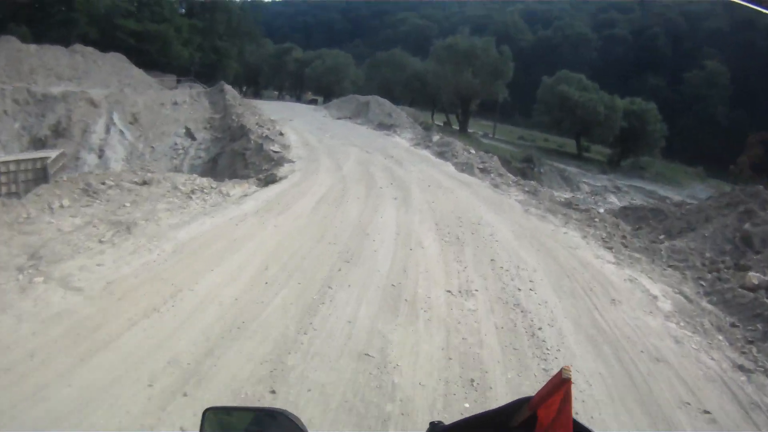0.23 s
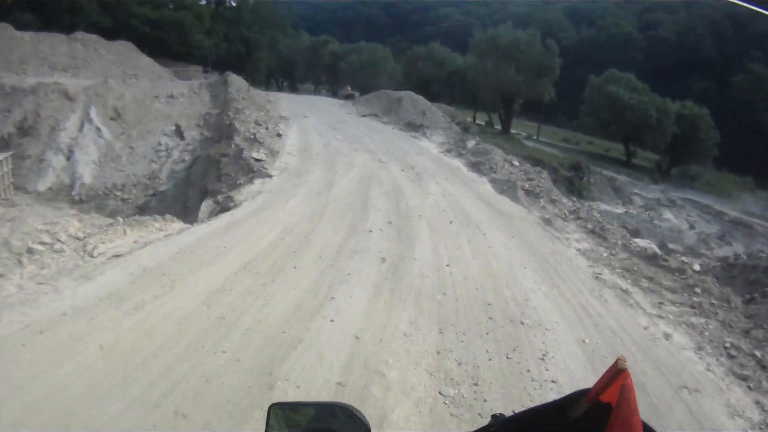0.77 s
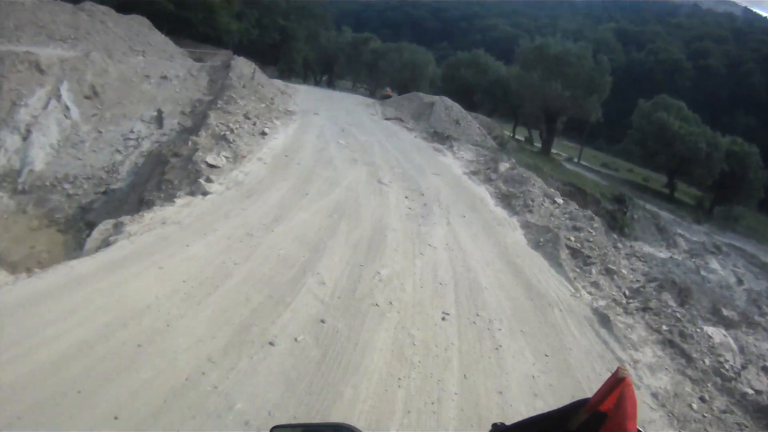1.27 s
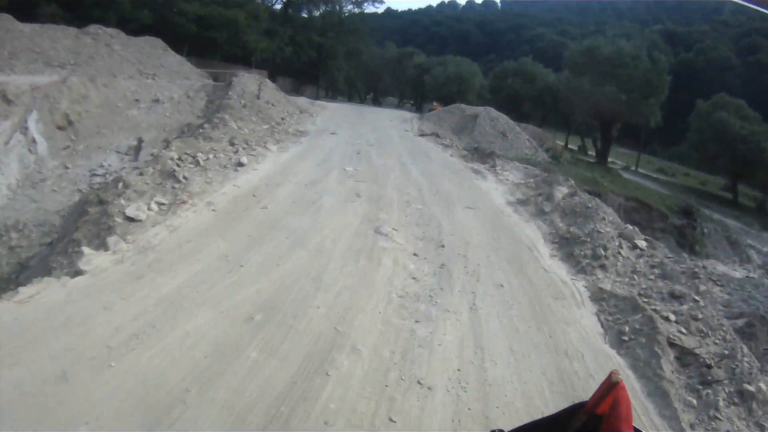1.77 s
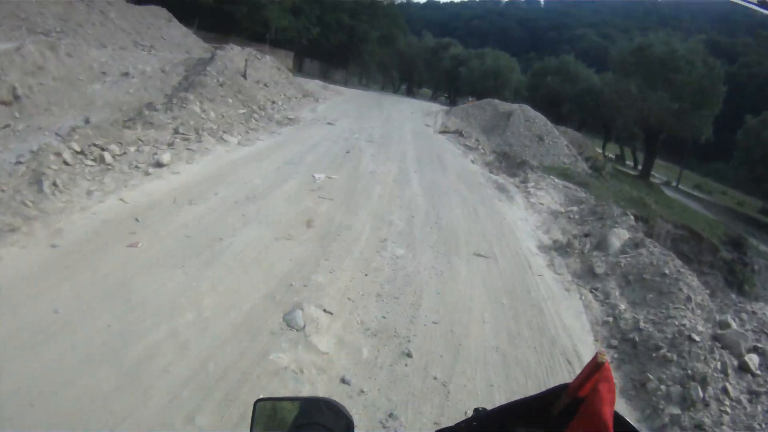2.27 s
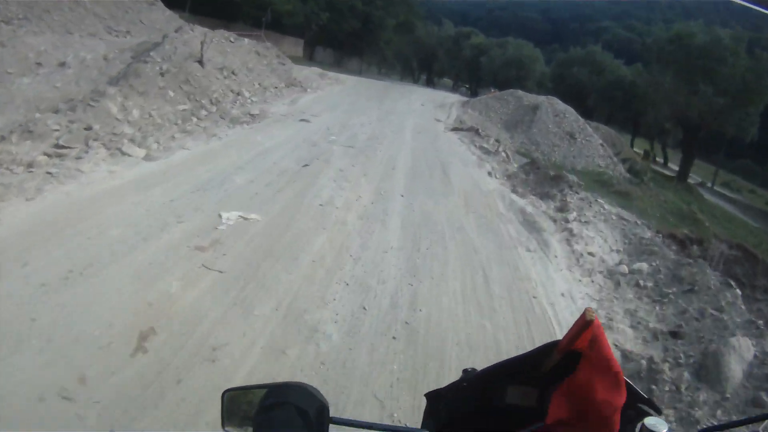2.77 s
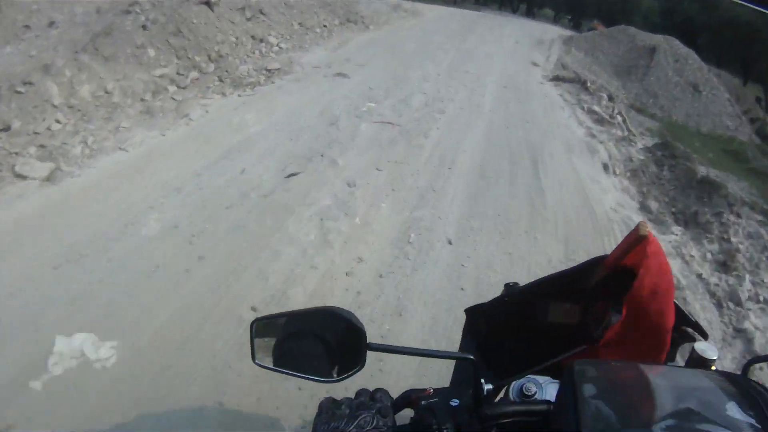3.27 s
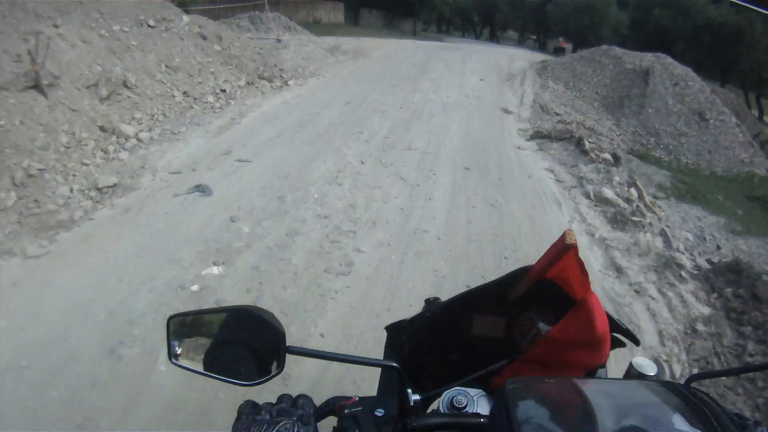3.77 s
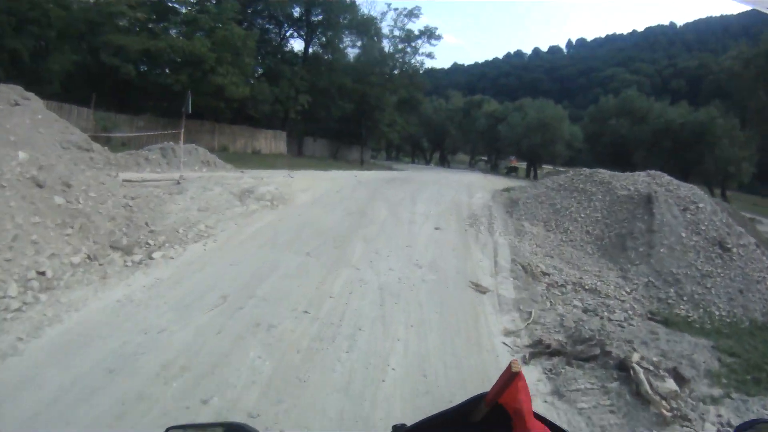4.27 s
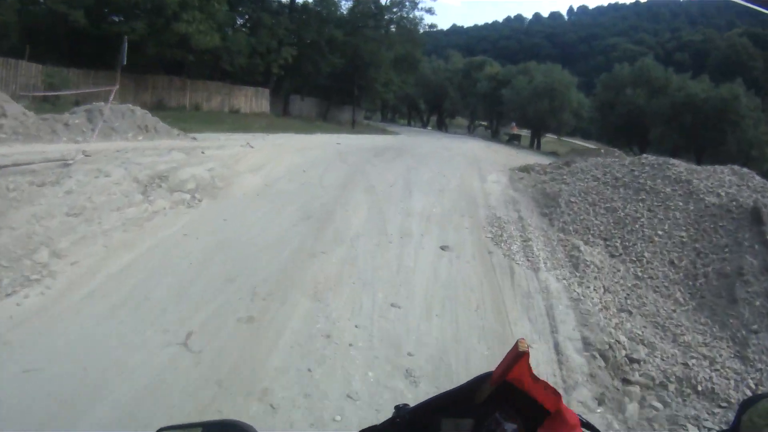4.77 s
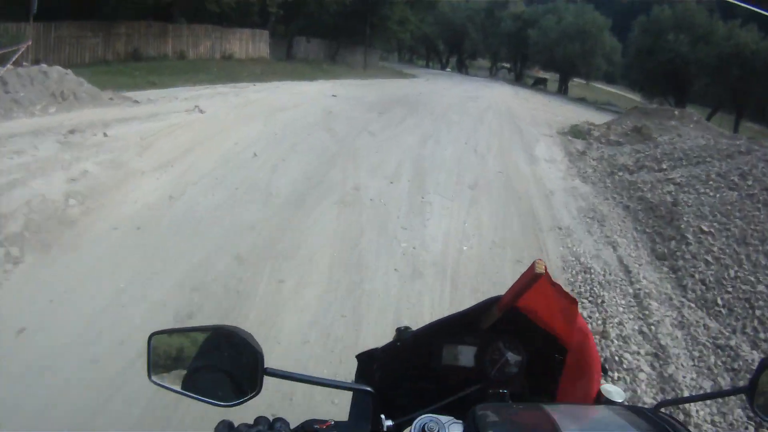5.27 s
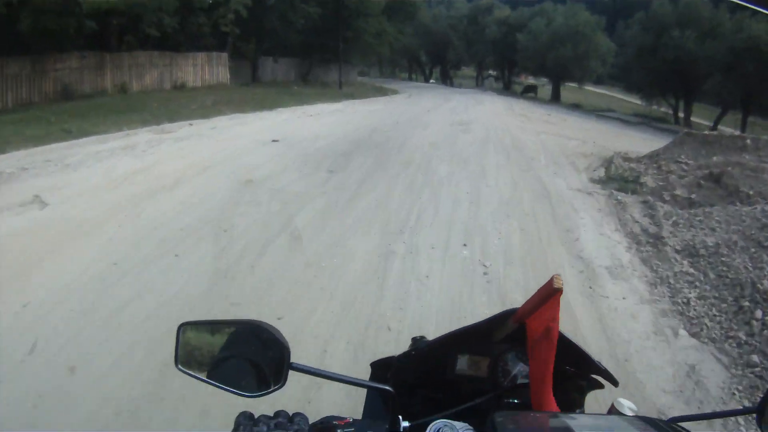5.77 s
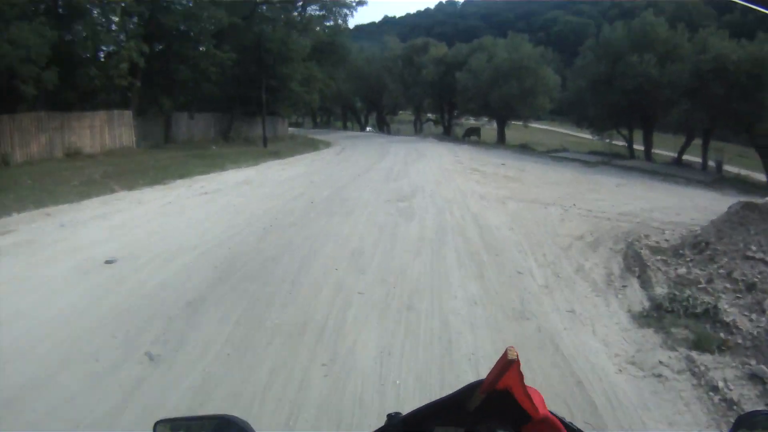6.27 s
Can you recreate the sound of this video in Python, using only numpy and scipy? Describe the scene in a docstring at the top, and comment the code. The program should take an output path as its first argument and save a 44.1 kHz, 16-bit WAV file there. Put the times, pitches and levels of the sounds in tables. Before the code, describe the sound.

From 0 to about 2.5 seconds, a small motorcycle putters on light throttle, its low hollow exhaust puffing roughly 43 times a second, often skipping weakly and catching again. A rough gear whine near 1100 Hz sings out briefly around 0.2, 0.8 to 1.0 and 2.1 to 2.5 seconds. Close to the rider, tyres rumble, chain and casings clatter, and gravel crunches faintly. Knocks rattle the bodywork around 0.6, 1.1, 1.4 and 1.6; stones ping softly at times, and dry grit ticks at 0.7, 3.1 and 3.55. Speed climbs from 2.5, still stumbling, then jumps around 3.6 to a quicker, fuller, mostly even pull near 70 firings a second. Dull bumps land around 4.1, 4.35, 4.8 and 5.4, with a short hiccup at 5.15. At 6.1 the throttle shuts; the note weakens and drops, sputtering as rumble and clatter swell with a rattling double bump near 6.4.

```python
"""A small motorcycle rides along a gravel road, heard from a camera carried by the rider.
The engine stumbles and skips firings on a light throttle, then pulls evenly until the throttle shuts.
Exhaust puffs ring a silencer resonance over a low throb, and a rough sine is the gear's whine.
Shaped random grains make the rumble, clatter and gravel crunch.
Bumps are dying noise and ringing panels; stone pings and grit ticks are dying tones."""
import sys
import numpy as np
from scipy import signal
from scipy.fft import rfft, irfft, next_fast_len
from scipy.io import wavfile
from scipy.ndimage import uniform_filter1d, map_coordinates

SR = 44100
rng = np.random.default_rng(int(sys.argv[2]) if len(sys.argv) > 2 else 0)


def wrap_up_sound(samples):
    """Save the sound to the file named by the first command line argument, as 16-bit audio."""
    columns = np.atleast_2d(samples).T
    # keep every value between -1 and 1, then stretch to whole-number steps
    tamed = np.clip(columns, -1, 1)
    steps = np.round(tamed * 32767).astype(np.int16)
    wavfile.write(sys.argv[1], SR, steps)


N = 287084
T = np.arange(N) / SR  # time of each sample, seconds

# Roughness of the ride. Each row: time in seconds, rumble level in dB, clatter level in dB.
ROAD_LEVELS = [(0, -29, -39.5), (.9, -29, -40), (1.03, -31, -42), (1.17, -28.5, -40), (1.8, -32.5, -40.5),
               (2.25, -30, -39.5), (2.9, -27.5, -39), (3.45, -30.5, -39.5), (3.8, -36, -43.5),
               (4.0, -36, -41.5), (4.2, -31.5, -40.5), (4.85, -30, -38), (5.03, -31.5, -39),
               (5.23, -26.5, -39), (5.5, -32.5, -39.5), (5.87, -32.5, -40), (6.13, -31.5, -39.5),
               (6.38, -25, -36), (6.51, -27.5, -33.5)]
# Tone colour of tyres, frame and air. Each row: pitch in Hz, relative dB per Hz.
RUMBLE_COLOUR = [(25, -32.5), (42, -14), (70, -12), (110, -3.5), (165, -2.5), (240, 1), (390, 1),
                 (500, 1.3), (610, 0), (700, -6), (860, -10), (1000, -11), (1300, -18), (2000, -33),
                 (4000, -66)]
# Tone colour of casings and chain. Each row: pitch in Hz, relative dB per Hz.
CLATTER_COLOUR = [(400, -23.5), (850, 4), (980, 7), (1350, 1.5), (1550, 1), (1830, 0.5), (2300, -7),
                  (2750, -17), (3250, -17), (3900, -30), (5000, -40), (9000, -68)]
# Tone colour of gravel. Each row: pitch in Hz, relative dB per Hz.
CRUNCH_COLOUR = [(2000, -18), (3800, 2), (4900, -3.5), (5500, 4.5), (6100, 2), (7000, -4.5), (9000, -8.5),
                 (11000, -10), (15000, -20.5)]
# The crunch grows quieter later on. Each row: time in seconds, change in dB from CRUNCH_DB.
CRUNCH_CHANGES = [(3.4, 0.5), (4.1, -3.5), (6.099, -3), (6.4, -1)]
CRUNCH_DB = -71.5
# How far the rattling parts' resonances come and go, and the pitch below which they do so less
PATCH_DB, PATCH_HZ = 2.4, 600

# Bumps that rattle the bike; soft ones stay dull. Each row: start in seconds, bodywork drive in dB,
# loose metal level in dB, time to die by 60 dB in seconds, brightness limit of the bodywork in Hz.
BUMPS = [(.603, -26.5, -49, 0.066, 1100), (1.13, -20, -60.5, 0.059, 1900), (1.141, -20.5, -68, .06, 1700),
         (1.422, -22, -45, .06, 2320), (1.593, -25, -67, 0.032, 1200), (1.65, -24, -51.5, 0.057, 1890),
         (2.576, -25.5, -74, .04, 810), (3.238, -27.5, -61, 0.036, 1097), (4.09, -24.5, -70, 0.045, 894),
         (4.352, -24.5, -77, 0.063, 900), (4.66, -32, -77, 0.03, 1100), (4.768, -21, -68, 0.034, 893),
         (5.417, -18, -82, 0.04, 560), (6.365, -26, -63.5, 0.088, 1986), (6.395, -23.5, -45.5, 0.069, 2040)]
# Tone colour of the bodywork's rattle. Each row: pitch in Hz, relative dB per Hz.
PANEL_COLOUR = [(250, -13.5), (550, 9), (850, 3.5), (1100, 6.5), (1450, -12.5), (2000, -2), (3000, -24.5),
                (5000, -33.5)]
# Tone colour of loose metal parts. Each row: pitch in Hz, relative dB per Hz.
FITTING_COLOUR = [(1000, -24), (2700, 14.5), (4500, -1.5), (6000, -3.5), (9000, -28), (15000, -33)]
# Ringing notes of the bodywork. Each row: average pitch in Hz, average relative level in dB.
PANEL_MODES = [(475, -3.5), (600, -6), (760, -1.5), (950, -2), (1160, -6), (1420, -10), (1700, -13.5),
               (1930, -16.5)]
CONTACT_S = .001  # a panel takes this long to ring up
REBOUND_S, REBOUND_DB = .01, -5  # a knocked panel strikes once more, weaker
# Stones pinging on metal. Each row: start in seconds, level in dB.
STONES = [(.482, -56), (1.653, -54), (2.503, -58.5), (5.296, -65.5), (6.223, -62)]
# Notes of the struck metal. Each row: average pitch in Hz, average relative level in dB,
# time to die by 60 dB in seconds.
METAL_MODES = [(5350, -3, .06), (5840, -8, 0.029), (6200, -6, 0.043), (10950, -22, 0.051)]
# Sharp ticks on the camera. Each row: start in seconds, peak level in dB.
GRIT = [(.71, -33), (3.134, -28.5), (3.5545, -27.5)]
TICK_T60 = .001  # seconds to die by 60 dB: grit ticks have no ring

# Engine speed before stumbles slow it. Each row: time in seconds, firings a second.
ENGINE_SPEED = [(0.0, 41.3), (0.22, 45.0), (0.42, 42.0), (0.6, 43.6), (1.0, 44.7), (1.2, 40.3), (1.5, 41.9),
                (2.0, 43.2), (2.5, 48.3), (3.12, 54.7), (3.52, 55.2), (3.57, 57.5), (3.62, 66.5),
                (3.7, 68.3), (3.77, 71), (3.95, 68.7), (4.02, 70.5), (4.18, 65.4), (4.31, 65.4), (4.43, 69),
                (4.5, 66.8), (4.57, 69.3), (4.91, 71.4), (4.97, 69.3), (5.05, 74.3), (5.2, 71.8),
                (5.29, 74.4), (5.39, 70.6), (5.5, 73.8), (5.6, 71.4), (5.73, 74), (5.85, 73), (5.96, 69.3),
                (6.11, 73.8), (6.16, 63), (6.25, 57), (6.31, 50), (6.42, 45), (6.51, 47)]
# Stumbles of the engine. Each row: start in seconds, number of weak firings in a row,
# weakest firing in dB, bang as it catches again in dB (both against a usual firing).
STUMBLES = [(.056, 1, -12, 0), (.105, 3, -17, 2.5), (.243, 1, -5, 2), (.29, 3, -8, 0), (.431, 1, -14, 1),
            (.48, 2, -14, 0), (.618, 1, -6, 2.5), (.665, 3, -8, 1), (.758, 1, -7, 2), (.803, 1, -14, 1),
            (.85, 2, -13, -3), (.92, 1, -3, 0), (.987, 1, -11, 1.5), (1.03, 7, -11, 1.5), (1.222, 1, -6, 0),
            (1.274, 1, -5, 1), (1.325, 3, -6, 2), (1.42, 3, -14, 0), (1.568, 1, -5, 0), (1.615, 3, -10, 0),
            (1.71, 1, -3, -1), (1.76, 1, -4, 2), (1.807, 1, -14, 0), (1.9, 3, -5, 2), (1.995, 3, -12, 0),
            (2.088, 1, -5, 0), (2.134, 1, -6, 2), (2.18, 3, -12, 3), (2.31, 1, -4, 0), (2.354, 2, -10, 0),
            (2.522, 2, -12, 0), (2.603, 1, -5, 1), (2.644, 1, -4, 1), (2.685, 2, -11, 1), (2.765, 1, -9, 1),
            (2.845, 2, -10, 0), (2.92, 1, -8, 2), (3.071, 1, -10, -1), (3.165, 4, -8, 3), (3.293, 2, -6, 2),
            (3.364, 1, -8, 4), (3.456, 1, -9, 0), (3.511, 1, -13, 2.5), (5.145, 2, -18, 2),
            (6.325, 2, -9, 1), (6.388, 1, -9, 2), (6.452, 1, -10, 0)]
CRUISE_HZ = 44  # firings a second on a light throttle
# Firings a second lost in a stumble at cruise, the delay of the loss and its half-width
SAG_HZ, SAG_LAG_S, SAG_S = 1.02, .058, .035

# Usual level of the gear whine. Each row: time in seconds, level in dB.
WHINE_LEVELS = [(0, -42), (1.45, -40.5), (1.7, -44), (2.6, -44), (3.1, -47), (3.35, -43.5), (3.52, -48),
                (3.62, -45), (3.75, -56), (3.92, -49), (4.2, -46), (4.55, -48), (5.2, -47), (5.28, -55),
                (5.35, -46), (5.65, -46.5), (5.9, -51), (6.2, -54)]
# The gear sings out as the drive takes up. Each row: middle in seconds, half-width in seconds,
# dB over its usual level, pitch in Hz at the middle, glide in Hz a second.
FLARES = [(.23, .05, 6.5, 1100, 300), (.61, .035, 3.5, 1120, -200), (.81, .04, 8, 1115, -250),
          (1.0, .05, 8, 1110, 350), (2.13, .05, 8.5, 1100, 550), (2.28, .055, 7.5, 1125, 800),
          (2.42, .05, 9.5, 1095, 0), (2.555, .014, 8, 1135, 0)]
TEETH = 24.1  # mesh cycles of the gear per firing
SLACK_HZ = 965  # floor of the whine's pitch with the drive slack, before flares and wander
# Shares at cruise: the whine's drop as a stumble slackens the drive, its wander as the chain whips
SNATCH, WANDER = .06, .012

# The throttle opens, eases, opens again and shuts. Each row: time in seconds, usual puff level in dB.
THROTTLE = [(0, -15), (2.4, -15), (3.4, -14), (3.9, -13), (4.25, -17.5), (4.45, -15.5), (5.1, -15),
            (5.22, -13), (5.45, -14.5), (6.11, -14.5), (6.135, -25), (6.25, -19.5), (6.3, -18), (6.51, -18)]
# Unevenness of the burns. Each row: time in seconds, spread in dB.
BURN_SPREAD = [(3.55, .7), (3.72, 1.8), (4.25, 1.3), (4.5, 2.2), (4.95, 2.2), (5.2, 1.6), (5.7, 1.1),
               (5.95, 1.7), (6.1, 1.0)]
SEESAW = .85  # share of a burn's excess that the next burn loses
RECOVER_DB, WEAK_DB = 3, -6  # in a stumble each firing gains this much on the last, but stays weak
# The silencer's average resonance at cruise; hotter gas raises it with this power of the speed
PIPE_HZ, PIPE_RISE = 297.8, .17
RING_T60 = .036  # seconds for the silencer's ring to die by 60 dB
TOP_HZ = 15300  # nothing is heard at or above this pitch


def amp(db):
    """Turn decibels into gain."""
    return 10 ** (np.asarray(db) / 20)


def unit(x):
    """Scale a sound to rms 1."""
    return x / np.sqrt(np.mean(x ** 2) + 1e-20)


def curves(rows):
    """Draw lines through a table: one value per sample for each column after the time."""
    s, *cols = np.transpose(rows)
    return [np.interp(T, s, c) for c in cols]


def wobble(rate):
    """Make a smooth random curve with this many random points a second."""
    return map_coordinates(rng.standard_normal(4096), [T * rate], mode="wrap")


def filtered(x, response):
    """Multiply each pitch in a sound by a gain that depends on the pitch."""
    padded = next_fast_len(x.shape[-1] + 8192)
    spectrum = rfft(x, padded) * response(np.fft.rfftfreq(padded, 1 / SR))
    return irfft(spectrum, padded)[..., :x.shape[-1]]


def coloured(x, points):
    """Shape a sound by (Hz, dB) points, at rms 1."""
    f, db = np.transpose(points)
    return unit(filtered(x, lambda hz: amp(np.interp(np.log(hz + 1), np.log(f), db))))


def strikes(times, sizes):
    """Make a train of single-sample impulses."""
    places = np.clip(np.round(times * SR).astype(int), 0, N)
    return np.bincount(places, sizes, N + 1)[:N]


def grains(rate, spread_db, channels=1):
    """Scatter tiny impacts of uneven size, about rate a second, at rms 1."""
    shape = (channels, N)
    sizes = rng.standard_normal(shape) * amp(spread_db * rng.standard_normal(shape))
    return unit(sizes * (rng.random(shape) < rate / SR))


def add(track, s, sound):
    """Mix a sound into a track at time s."""
    part = track[max(round(s * SR), 0):][:len(sound)]
    part += sound[:len(part)]


def restless(x):
    """Narrow resonances swell and fade at random, as loose parts shift against each other."""
    hz, _, z = signal.stft(x, SR, nperseg=1024)
    across_pitch = uniform_filter1d(rng.standard_normal(z.shape), size=2, axis=0)
    field = uniform_filter1d(across_pitch, size=7, axis=1)  # smooth over time as well
    depth_db = PATCH_DB * np.minimum(hz / PATCH_HZ, 1)[:, None]
    return signal.istft(z * amp(depth_db * unit(field)), nperseg=1024)[1][:N]


def rumble(level_db):
    """Tyres, frame and air: many small impacts through a low, restless colour."""
    impacts = restless(grains(rate=6000, spread_db=1.5)[0])
    return amp(level_db) * coloured(impacts * amp(1.0 * wobble(30)), RUMBLE_COLOUR)


def gravel():
    """Fine stones crunch: high-pitched grains, nearly the same on both sides."""
    mid, side = coloured(grains(rate=13000, spread_db=1.5, channels=2), CRUNCH_COLOUR)
    change_db, = curves(CRUNCH_CHANGES)
    return amp(CRUNCH_DB + change_db) * (mid + amp(-14.5) * np.array([side, -side]))


def clatter(level_db, cycles, stall, slack_db=1.2):
    """Casings and chain shake once a firing, and louder while a stumble slackens the chain."""
    beat = amp(1.3 * np.cos(2 * np.pi * cycles) + .8 * wobble(60))
    shaking = grains(rate=3000, spread_db=1.5)[0] + .92 * rng.standard_normal(N)
    return amp(level_db + slack_db * stall) * coloured(beat * restless(shaking), CLATTER_COLOUR)


def rattle(colour, t60):
    """A dying flurry of contacts through a part's colour, about rms 1 near its start."""
    t = np.arange(SR // 4) / SR
    fade = amp(-60 * t / t60)
    onset = np.minimum(t / .00037, 1)
    noise = coloured(onset * fade * rng.standard_normal(len(t)), colour)
    return noise * np.sqrt(np.mean(fade ** 2)) * onset


def clonk(t60):
    """A blow rings the bodywork's modes, and a weaker rebound rings them again."""
    t = np.arange(SR // 4) / SR
    hz, db = np.transpose(PANEL_MODES)
    out = np.zeros(len(t))
    envelope = np.minimum(t / CONTACT_S, 1) * amp(-60 * t / t60)
    for s, blow_db in [(0, 0), (REBOUND_S, REBOUND_DB)]:
        tuning, scatter, phase = rng.standard_normal((3, len(hz)))
        modes = np.sin(2 * np.pi * (np.outer(hz * (1 + .027 * tuning), t) + phase[:, None]))
        add(out, s, amp(blow_db + db + 2.5 * scatter) @ modes * envelope)
    return out


def bumps():
    """Each bump rings and rattles the bodywork, dulled by a low-pass, and shakes loose metal."""
    out = np.zeros(N)
    for s, body_db, metal_db, t60, bright_hz in BUMPS:
        dull = signal.butter(2, bright_hz, fs=SR, output="sos")
        body = signal.sosfilt(dull, .79 * clonk(t60) + .87 * rattle(PANEL_COLOUR, t60))
        add(out, s, amp(body_db) * body + amp(metal_db) * rattle(FITTING_COLOUR, t60))
    return out


def stones():
    """A stone pings on metal: a few dying notes, each slightly random in pitch and level."""
    out, t = np.zeros(N), np.arange(SR // 4) / SR
    for s, db in STONES:
        for hz, level_db, t60 in METAL_MODES:
            fade = amp(db + level_db + rng.normal(0, 2) - 60 * t / t60)
            add(out, s, fade * np.sin(2 * np.pi * hz * rng.normal(1, .01) * t))
    return out


def grit():
    """Grit ticks on the camera: a 3000 Hz tone that dies almost at once."""
    out, t = np.zeros(N), np.arange(SR // 4) / SR
    for s, db in GRIT:
        add(out, s, amp(db - 60 * t / TICK_T60) * np.cos(2 * np.pi * 3000 * t))
    return out


def stalling():
    """How bogged down the engine is: a smooth hump just after each stumble of several firings."""
    return sum(np.exp(-.5 * ((T - s - SAG_LAG_S) / SAG_S) ** 2)
               for s, count, _, _ in STUMBLES if count > 1)


def shaft(stall):
    """Firings a second, sagging at each longer stumble, and less so at high speed."""
    speed, = curves(ENGINE_SPEED)
    return speed - SAG_HZ * stall * (CRUISE_HZ / speed) ** 2


def gear(cycles, speed, stall):
    """Meshing teeth whine with the shaft, bent once a firing; purer at speed and when singing out."""
    slackening = SNATCH * stall * (CRUISE_HZ / speed) ** 2
    mesh_hz = np.maximum(TEETH * speed * (1 - slackening), SLACK_HZ)
    db, = curves(WHINE_LEVELS)
    loose = CRUISE_HZ / speed  # how rough the tone is
    for s, width, flare_db, sing_hz, glide in FLARES:
        flare = np.exp(-.5 * ((T - s) / width) ** 4)
        mesh_hz = mesh_hz + np.sqrt(flare) * (sing_hz + glide * (T - s) - mesh_hz)
        db = db + flare_db * flare
        loose = loose - .45 * flare
    mesh_hz = mesh_hz * (1 + WANDER * wobble(28) * loose)
    bend = loose * (.6 * wobble(130) + .65 * np.sin(2 * np.pi * cycles))  # radians
    phase = 2 * np.pi * np.cumsum(mesh_hz) / SR + bend
    waver = amp(3.6 * loose * wobble(60))
    return amp(db) * unit(np.sin(phase) * waver)


def firings(cycles, jitter_s=.00016):
    """Times and sizes of the exhaust puffs: one a cycle, uneven, and weak in stumbles."""
    times = np.interp(np.arange(int(cycles[-1])) + .5, cycles, T)
    db = np.zeros(len(times))
    # a stumble starts with its weakest firing, recovers, then catches again
    for s, count, depth_db, catch_db in STUMBLES:
        recovery = depth_db + RECOVER_DB * np.arange(int(count))
        run = np.minimum(recovery, max(WEAK_DB, depth_db))
        first = np.argmin(abs(times - s))
        db[first:first + len(run) + 1] = np.append(run, catch_db)
    # strong and weak burns tend to take turns
    seesaw = unit(signal.lfilter([1], [1, SEESAW], rng.standard_normal(len(times))))
    db = db + np.interp(times, *np.transpose(BURN_SPREAD)) * np.clip(seesaw, -2, 2)
    db = db + np.interp(times, *np.transpose(THROTTLE))
    return times + jitter_s * rng.standard_normal(len(times)), amp(db)


def throb(cycles, times, sizes, first_db=-26, second_db=-30, idle_db=-2):
    """Gas pushed out by the puffs hums at once and twice the firing rate, weaker in skips."""
    drive = np.interp(T, times, sizes) * amp(np.interp(T, [3.2, 3.6], [idle_db, 0]))
    first = amp(first_db + .51 * wobble(22)) * np.cos(2 * np.pi * cycles)
    second = amp(second_db + 2.8 * wobble(30)) * np.sin(4 * np.pi * cycles)
    return np.sqrt(2) * uniform_filter1d(drive, size=SR // 36) * (first + second)


def exhaust(times, sizes):
    """Each puff swells fast and fades slower in the silencer, with a thump, short ring and faint rasp."""
    swell_s, fade_s, thump_s = .0024, .0035, .0057
    ring_hz, ring_db, thump_hz, thump_db, rasp_db = 250, -20, 110, -17, -45
    delay_s = .006  # from firing to the puff's peak
    t = np.arange(-SR // 50, SR // 25) / SR  # zero at the peak
    after = np.maximum(t, 0)
    puff = -np.exp(-.5 * (t / np.where(t < 0, swell_s, fade_s)) ** 2)
    ring = amp(ring_db - 60 * after / RING_T60) * np.sin(2 * np.pi * ring_hz * after)
    thump = -amp(thump_db) * np.exp(-.5 * (t / thump_s) ** 2) * np.cos(2 * np.pi * thump_hz * t)
    # slow cycles let the pipe empty, so each puff thumps harder
    periods = np.gradient(times)
    slowness = (periods / periods.max()) ** 2
    note = np.zeros(N)
    for s, size, slow, period in zip(times, sizes, slowness, periods):
        pipe_hz = PIPE_HZ / (period * CRUISE_HZ) ** PIPE_RISE * rng.normal(1, .0076)
        pulse = puff * np.cos(2 * np.pi * pipe_hz * t) + slow * thump + ring
        add(note, s + delay_s + t[0], size * pulse)
    rasp_colour = [(300, -31.5), (480, 5.5), (620, -6), (780, 1.5),
                   (1100, -18.5), (2000, -27.5), (4000, -64.5)]  # Hz, relative dB per Hz
    rasp = coloured(strikes(times + delay_s, sizes), rasp_colour)
    return note + amp(rasp_db) * rasp


def scene():
    """Road, knocks and engine together; the shaft drives exhaust, throb, gear and clatter."""
    stall = stalling()
    speed = shaft(stall)
    cycles = np.cumsum(speed) / SR  # firings so far
    times, sizes = firings(cycles)
    rumble_db, clatter_db = curves(ROAD_LEVELS)
    road = rumble(rumble_db) + clatter(clatter_db, cycles, stall) + gravel()
    knocks = bumps() + stones() + grit()
    pan_db = .098 * np.array([[-1], [1]])  # the exhaust lies a touch to the right
    engine = amp(pan_db) * exhaust(times, sizes) + throb(cycles, times, sizes)
    return road + knocks + gear(cycles, speed, stall) + engine


def record(dry):
    """The camera drops the deepest bass and all above its band limit."""
    low_cut_hz = 36
    return filtered(dry, lambda hz: (hz < TOP_HZ) * hz ** 2 / np.hypot(hz ** 2, low_cut_hz ** 2))


dry = scene()
out = record(dry)
wrap_up_sound(out)
```